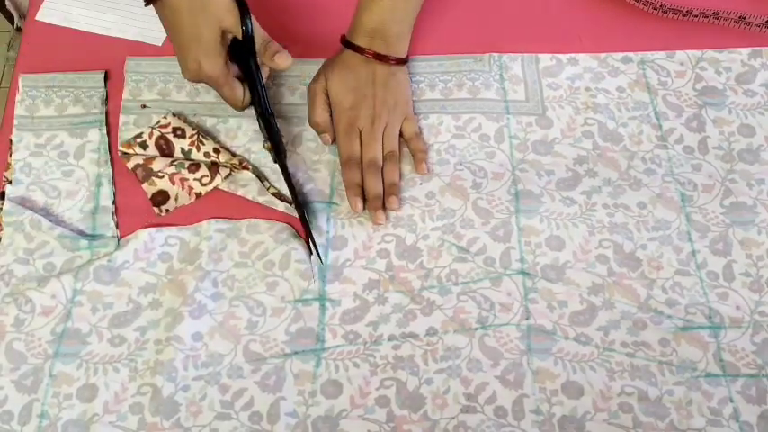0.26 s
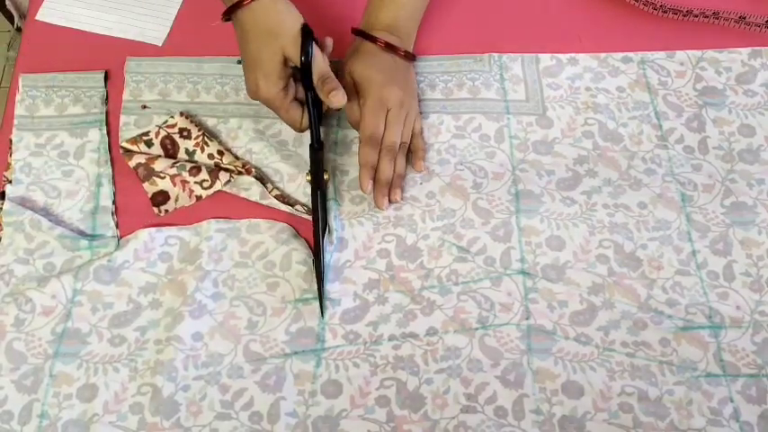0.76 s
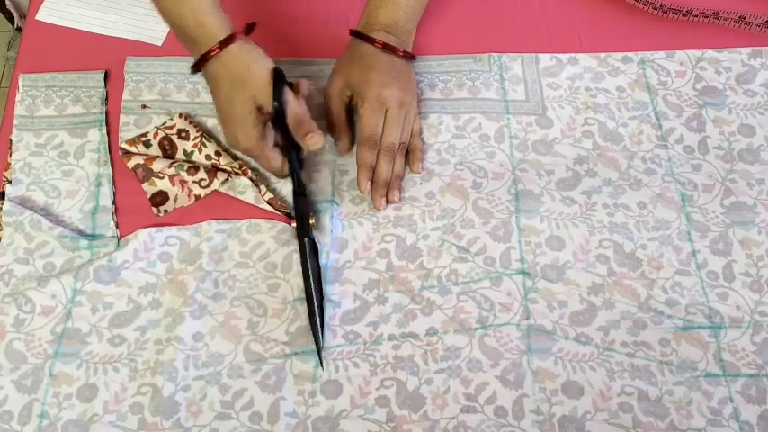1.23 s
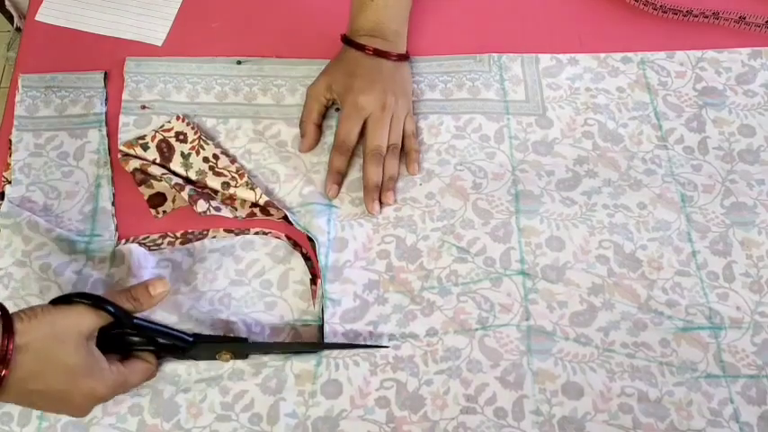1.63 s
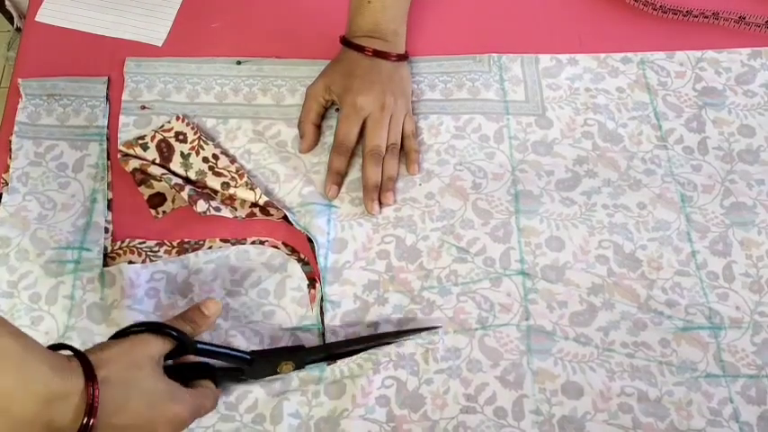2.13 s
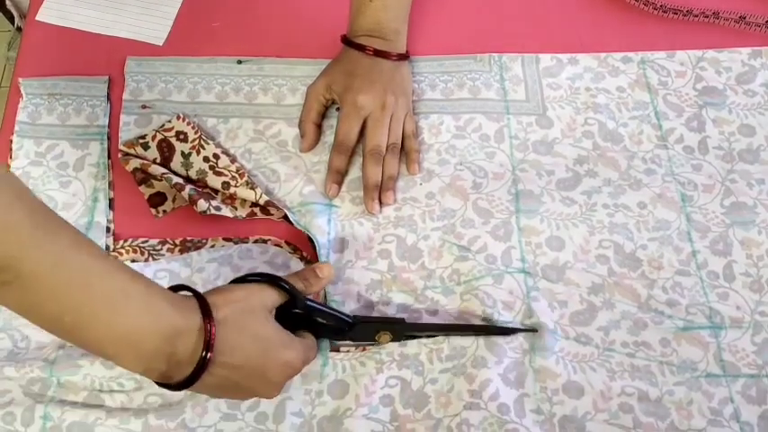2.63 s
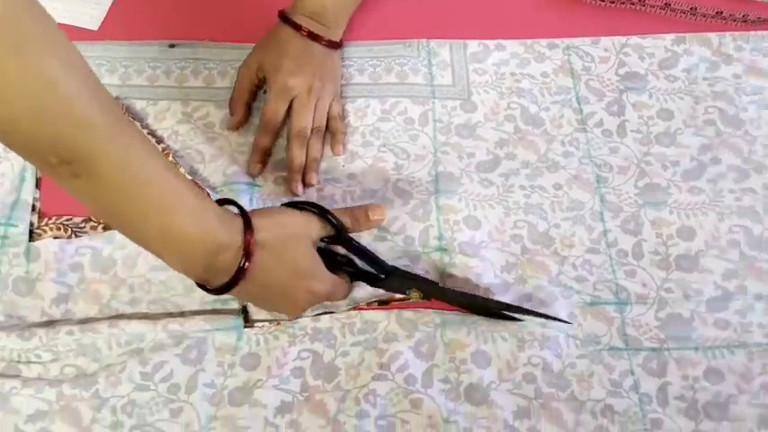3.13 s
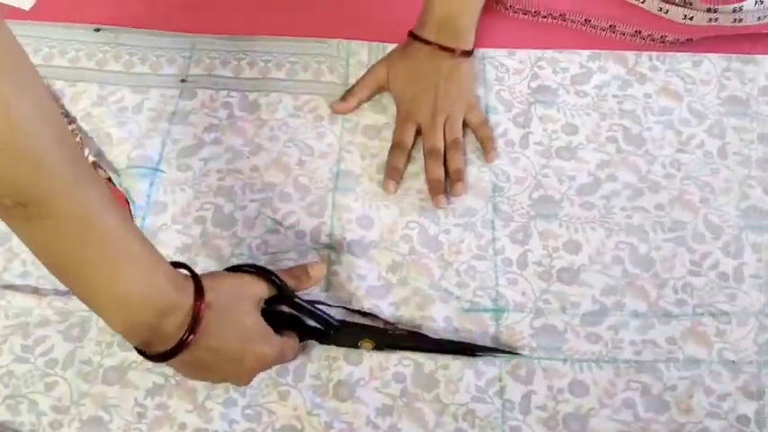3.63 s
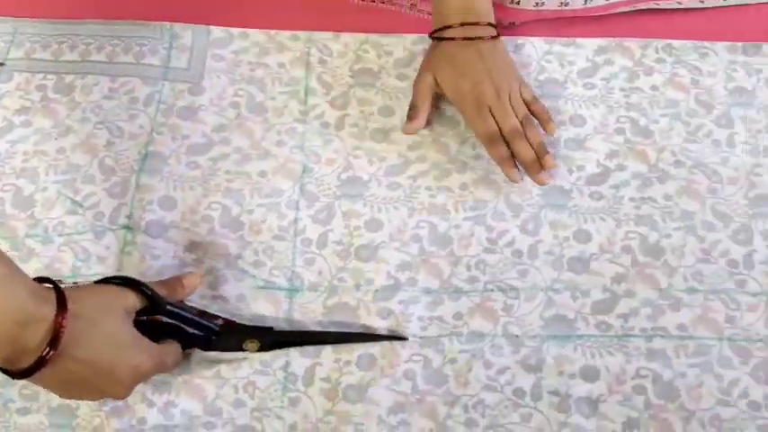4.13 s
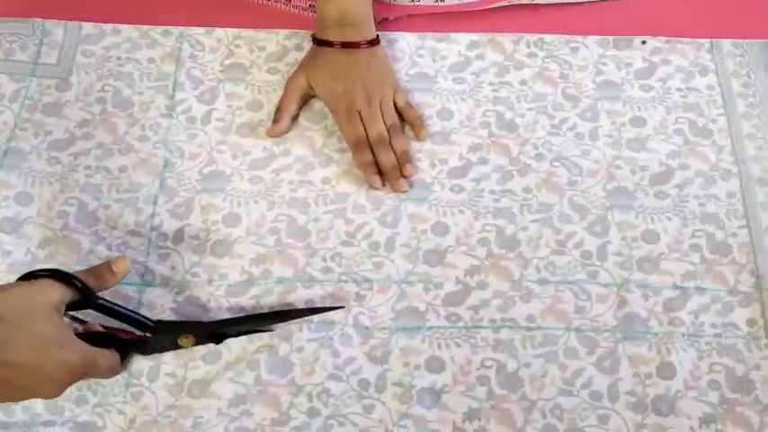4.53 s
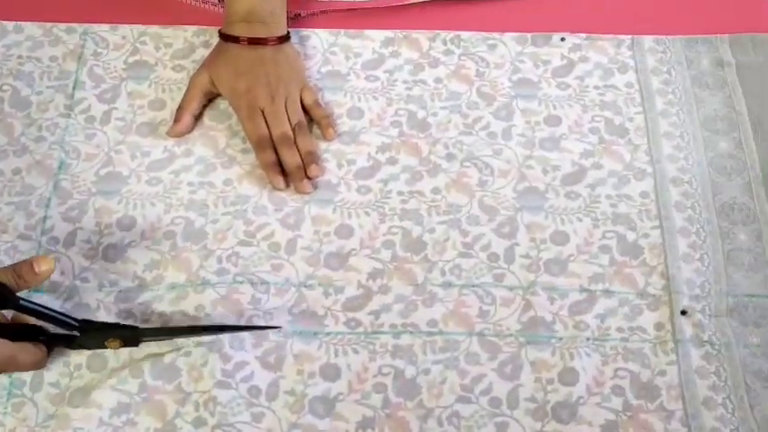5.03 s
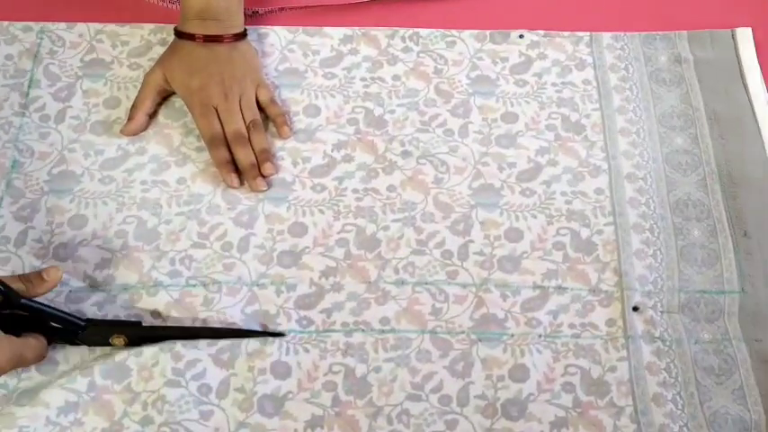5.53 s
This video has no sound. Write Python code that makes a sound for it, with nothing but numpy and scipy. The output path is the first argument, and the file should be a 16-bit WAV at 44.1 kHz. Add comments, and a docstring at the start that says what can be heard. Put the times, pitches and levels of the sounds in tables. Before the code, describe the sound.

Large steel scissors cut layered cloth on a hollow wooden table, heard close up in a quiet room with a faint low hum. From the start, six snips come at roughly four a second, each a short crunchy hiss with a woody thud, with softer scrapes as the blades reopen. Thin, very high squeaks and light steel clicks accompany many strokes. At about 1.4 seconds the cutting pauses, leaving a faint rustle of cloth. It resumes at 2 seconds and runs evenly until about 4.9, with a soft low thump of a hand or handle at 2.4. The lower blade knocks on the wood throughout, most sharply between 3.5 and 4.6 seconds. A second short pause holds another soft thump at about 5.1 seconds. Two last snips with knocks follow at about 5.5 and 5.7 seconds.

```python
"""Large steel scissors snip through layered cloth on a hollow wooden table, about four strokes a second.
Each closing stroke parts threads in a hiss and forces the table's modes into vibration; the reopening
blades scrape more softly. The edges squeak by friction, steel clacks on steel, the lower blade knocks
on the wood, and twice a hand or handle thumps on the cloth. A quiet room hums underneath;
two microphone ports hear the bass alike and the treble apart."""
import sys
import numpy as np
from scipy import signal
from scipy.fft import rfft, irfft, next_fast_len
from scipy.io import wavfile
from scipy.ndimage import uniform_filter1d, map_coordinates

SR = 44100
rng = np.random.default_rng(int(sys.argv[2]) if len(sys.argv) > 2 else 0)


def unload_audio(sound):
    """Save the sound as a 16-bit wav file, at the path given as the first command line argument."""
    columns = np.transpose(np.atleast_2d(sound))
    # keep every value between -1 and 1, then stretch to whole-number steps
    steps = np.round(np.clip(columns, -1, 1) * 32767)
    wavfile.write(sys.argv[1], SR, steps.astype(np.int16))


N = 254016

# Levels in the tables are nominal: each source applies its own gain.
# closing strokes: (bite time [s], length [s], dying time [s], heaviest load [share of length],
# hiss at bite [dB], hiss at shut [dB], boom [dB], middle ring [dB], upper ring [dB], rustle at shut [dB])
CUTS = [ (0.0, 0.015, 0.054, .05, -56, -53.5, -41.5, -56, -51.5, -60.5),
        (0.219, 0.053, 0.067, 0.81, -58.5, -49.5, -42.5, -56, -57, -61),
        (0.65, 0.06, 0.069, 0.17, -60.5, -50.5, -39.5, -55, -55, -63.5),
        (0.899, 0.05, 0.043, 0.17, -54, -46.5, -40, -49.5, -50, -62),
        (1.139, .046, 0.044, 0, -52.5, -48, -36, -50.5, -48.5, -62.5),
        (1.319, 0.069, 0.052, 0.71, -63.5, -49, -38.5, -62.5, -53.5, -58),
        (1.969, 0.081, 0.042, 0.71, -59.5, -44.5, -32.5, -44, -47.5, -60),
        (2.259, 0.055, 0.06, 0.44, -64, -49, -34.5, -45, -49.5, -59),
        (2.502, .066, 0.034, 0.49, -64, -47.5, -32.5, -45.5, -48.5, -59.5),
        (2.746, 0.083, 0.033, 0.86, -62.5, -55, -33, -52, -36.5, -55.5),
        (2.998, 0.056, 0.054, 0.68, -63, -46.5, -39, -41.5, -42.5, -57.5),
        (3.231, 0.07, 0.041, 0.56, -66.5, -51, -37, -39.5, -47.5, -62),
        (3.473, 0.077, .03, 0.51, -58, -53.5, -43, -37, -46.5, -59),
        (3.741, 0.071, 0.043, 0.48, -66, -48.5, -39, -30, -47, -56.5),
        (4.011, 0.042, 0.033, 0.24, -63, -55.5, -45, -35.5, -50, -67),
        (4.293, .05, 0.044, 0.53, -60, -57, -48, -36, -47, -66),
        (4.559, 0.055, 0.049, 0.05, -55.5, -46.5, -37, -35.5, -43, -50),
        (4.841, 0.029, 0.051, 0.26, -59.5, -60, -41, -42, -50, -67.5),
        (5.456, 0.036, 0.081, 0.55, -57, -54, -39.5, -45.5, -48.5, -64),
        (5.718, 0.034, 0.054, 0.5, -54, -50, -40.5, -36.5, -43, -59)]
# reopening blades, and the light scrape that leads into some bites: (time [s], hold [s], scrape [dB], boom
# [dB], upper ring [dB], rustle [dB])
SLIDES = [ (0.086, .14, -72, -55, -73.5, -73.5), (0.342, 0.013, -83, -51, -71.5, -82),
          (0.785, 0.013, -88, -57, -69, -92), (1.008, 0.0097, -76, -59, -65, -90),
          (1.237, 0.014, -88, -55, -69, -98), (1.459, 0.048, -64, -58, -73, -63),
          (1.655, 0.11, -83, -65, -82, -80), (1.886, 0.0099, -107, -68, -79, -69),
          (1.948, .03, -98, -67, -77, -73), (2.071, 0.045, -70, -54.5, -66.5, -79),
          (2.397, 0.005, -49.5, -44.5, -62.5, -58.5), (2.626, 0.013, -62.5, -52, -61, -81),
          (2.891, 0.0074, -66.5, -51, -65, -73), (2.946, 0.024, -71, -56.5, -77, -75),
          (3.121, 0.0071, -60.5, -54, -60.5, -76), (3.337, 0.053, -66, -59, -67, -72.5),
          (3.56, 0.021, -63.5, -64, -73, -78), (3.613, 0.018, -69, -59, -57.5, -80),
          (3.747, 0.026, -86, -58, -80, -92), (3.873, 0.0062, -65, -71, -63, -75),
          (3.985, 0.014, -69.5, -67, -76, -94), (4.115, 0.026, -77, -73, -72, -79),
          (4.415, 0.018, -90, -59, -64.5, -79), (4.484, .03, -76, -80, -78, -73.5),
          (4.672, 0.01, -70, -62, -60.5, -82), (4.77, 0.13, -80, -72, -85, -81),
          (4.935, 0.018, -54.5, -84, -75, -54), (5.425, .025, -65.5, -58.5, -77, -91),
          (5.594, 0.0074, -64.5, -78, -67, -82), (5.703, 0.022, -59.5, -57, -84, -85)]
# edges rubbing: (time [s], nominal length [s], nominal starting pitch [Hz], level [dB])
SQUEAKS = [(0.21, .013, 8700, -63), (0.677, .018, 4480, -59), (0.679, 0.023, 8200, -53),
           (1.156, 0.026, 8260, -46), (1.342, 0.024, 4570, -53), (1.365, 0.037, 7600, -57),
           (1.966, 0.012, 8360, -53), (2.009, 0.014, 8300, -48), (2.107, 0.023, 8600, -60.5),
           (2.253, .025, 12430, -51.5), (2.254, 0.023, 8250, -56.5), (2.283, .024, 8030, -53),
           (2.284, .015, 13100, -50), (2.502, 0.027, 12500, -53.5), (2.754, 0.035, 8640, -58.5),
           (2.755, 0.034, 12500, -57), (2.783, .015, 4560, -56), (2.996, 0.023, 8710, -58),
           (3.113, .015, 7800, -61), (3.228, 0.034, 8370, -58), (3.234, 0.04, 12400, -54),
           (3.486, 0.021, 12400, -55), (3.491, 0.013, 8600, -55), (3.563, .034, 8400, -54),
           (3.569, 0.025, 13940, -55), (3.745, 0.029, 8660, -54.5), (4.008, 0.029, 12500, -56),
           (4.018, 0.015, 8500, -63), (4.281, .029, 8300, -57.5), (4.293, .018, 12400, -53.5),
           (4.31, .015, 13070, -57), (4.425, 0.013, 8500, -61), (4.528, 0.062, 8370, -53),
           (4.679, 0.011, 8000, -56), (4.831, 0.037, 8030, -56), (4.833, 0.036, 12650, -56),
           (4.936, .015, 2477, -47.5), (4.953, 0.019, 8460, -59), (4.955, 0.022, 7160, -59),
           (5.408, 0.071, 8100, -53), (5.456, 0.018, 12900, -50), (5.586, 0.02, 8400, -58.5),
           (5.682, 0.042, 8100, -51), (5.697, 0.042, 12400, -53)]
# blade pitches that attract a squeak: (frequency [Hz])
LOCK_HZ = [2460, 4370, 7480, 8560, 13200, 13900]
# jolts of the lower blade on the table: (time [s], level [dB], relative boom [dB])
KNOCKS = [(0.095, -38, -4), (0.228, -43.5, 12), (0.262, -40, 11), (0.275, -47.5, 17.5), (0.332, -51, 16),
          (0.651, -50.5, 15.5), (0.681, -42, 12), (0.708, -46, 8.5), (0.896, -40.5, 6), (0.922, -35.5, -21),
          (1.145, -31, -21), (1.183, -37.5, 9.5), (1.99, -29.5, -4), (2.047, -35.5, 9.5),
          (2.265, -44.5, 18), (2.272, -46.5, 7), (2.514, -43.5, 8), (2.533, -34.5, 1), (2.549, -58, -7),
          (2.567, -34, 9), (2.761, -27, -1.5), (2.772, -34.5, 8.5), (2.796, -31, -19), (2.815, -29.5, -9),
          (2.824, -44, 16.5), (3.017, -27, -18), (3.033, -42, 7), (3.052, -43, -38), (3.242, -35.5, -21),
          (3.26, -34, 10), (3.299, -34.5, -2), (3.495, -32.5, 2), (3.508, -20, -14), (3.524, -24, -9),
          (3.605, -52, -5), (3.749, -26, -13), (3.772, -29, -21), (3.803, -25, -2), (4.019, -27, -8.5),
          (4.038, -31.5, -1.5), (4.297, -27.5, -5.5), (4.316, -19.5, -14), (4.332, -28, -16),
          (4.553, -32, 2.5), (4.576, -21.5, -4.5), (4.844, -42.5, 14.5), (4.857, -36, 4), (5.464, -38, 10),
          (5.476, -23.5, -2.5), (5.572, -52, 15), (5.719, -31, 1.5), (5.729, -45, 5)]
# tips shutting or pivot play: (time [s], level [dB], relative crack [dB], crack t60 [s])
CLACKS = [(0.9424, -32, -28, 0.028), (1.1763, -38, -42, 0.062), (1.389, -59, -20, 0.078),
          (2.0472, -38, -29, 0.029), (2.3181, -47.5, -10.5, 0.025), (2.5636, -48, -17, 0.03),
          (2.812, -49.5, -5, 0.068), (3.5433, -51.5, -14, 0.046), (3.8043, -37.5, -11, 0.025),
          (4.009, -44, -21.5, 0.098), (4.1016, -43, -32, 0.099), (4.4523, -39.5, -69, 0.085),
          (5.6286, -65.5, -10, 0.03)]
# a hand or handle landing on the cloth: (time [s], level [dB], final pitch [Hz], t60 [s])
THUMPS = [(2.403, -30.5, 108, 0.15), (5.137, -34, 103, 0.073)]
# the scissors' path over the table:
# (time [s], rings left minus right [dB], idle rustle [dB], idle boom [dB], puff relative to boom [dB])
TRAVEL = [(0.0, 2.5, -62, -75, -26), (0.14, 5, -69, -70, -24), (0.32, 3, -76.5, -67.5, -24),
          (1.03, 0, -89, -53, -25), (1.5, 1.5, -80.5, -69.5, -30), (1.91, 8, -81, -60.5, -31),
          (2.13, -2, -90, -81, -36), (2.57, 5, -93, -69, -30), (3.5, 3.5, -74.5, -81, -19),
          (3.85, 2, -85, -73, -15), (4.54, 4, -71, -85, -19), (5.1, -1, -83.5, -69.5, -28),
          (5.76, 1, -91, -58.5, -12)]
# table modes: (frequency [Hz], bandwidth [Hz], level [dB], left lead [rad], left minus right [dB])
BOOM_MODES = [(306.7, 52.5, -4.5, 0.16, 1), (188, 110, -14, .1, 2.5), (262.5, 25.4, 2.5, 0.077, -0.5),
              (128.8, 84, -13, 0.017, 0)]
MIDDLE_MODES = [(683.5, 119, -2.5, -0.76, 0.0084), (760, 46.5, 2, -0.82, 0.011), (802, 130, -7.5, -1.62, 0),
                (512, 315, -18, -0.79, 0)]
UPPER_MODES = [(968, 107, -8, -1.3, 0), (1127, 78, -1, -2.07, 0.0081), (1334, 186, -15.5, -2.03, 1)]
# blade resonances: (frequency [Hz], bandwidth [Hz], level [dB])
BLADE_MODES = [(8450, 89, 0.5), (13100, 290, -12), (14100, 1200, -11.5)]
# noise of shearing, scraping, dull rustling and the room: (frequency [Hz], spectral density [dB])
SHEAR_SPECTRUM = [(1760, -15.5), (3000, -10), (4550, -2), (5690, -9.5), (6180, -3), (8630, -3), (9780, -6),
                  (14700, -4), (15800, -1)]
SCRAPE_SPECTRUM = [(1760, -9), (3000, -4), (4490, -2.5), (8570, -2), (9780, -8.5), (12400, -6.5),
                   (14900, -11), (15800, 1)]
RUSTLE_SPECTRUM = [(900, -15), (1500, -9.5), (2400, 0.5), (3200, -6.5), (5000, -18.5), (9000, -65)]
ROOM_SPECTRUM = [(15, -53), (25, -9), (184, -5), (255, 0.5), (572, -16), (981, -18), (1590, -27),
                 (2260, -28.5), (5370, -43.5), (8270, -40), (9990, -49.5), (14600, -37), (15800, -71)]
# slopes before and after a cut's heaviest load: (boom [dB/s], middle [dB/s], upper [dB/s])
LOAD_DB_PER_S = [139, 318, 257]
EASE_DB_PER_S = [157, 245, 189]
# fall over a cut's dying time: (hiss [dB], boom [dB], middle [dB], upper [dB], rustle [dB])
DYING_DB = [39.2, 27.4, 24.7, 23, 23]
# slopes before and after a slide's hold: (scrape [dB/s], boom [dB/s], upper [dB/s], rustle [dB/s])
SWELL_DB_PER_S = [1190, 520, 795, 960]
FADE_DB_PER_S = [715, 407, 590, 550]
# likeness of the room noise at the two ports: (frequency [Hz], correlation [0-1])
ROOM_COHERENCE = [(60, 0.65), (300, 0.58), (700, 0), (1500, 0), (15000, 0.24)]
# the right side is slightly brighter: (frequency [Hz], left minus right [dB])
TREBLE_BALANCE = [(9000, 0.5), (13000, -1.5)]
# the treble fades out just below 16 kHz: (frequency [Hz], gain [dB])
ROLL_OFF = [(15200, -0.5), (15800, -12)]

BITE_S, BITE_DB = .012, 16.5  # time and rise as the edges take hold
RUSTLE_DB_PER_S = 133  # the rustle grows until the tips shut
PULL_PER_S = 23.8  # pull on a squeak towards the nearest blade pitch
ROOM_DB, TOP_HZ = -63, 15830
SIDE = np.array([[.5], [-.5]])  # splits a left-right difference between the two sides


def cuts():
    """Shear: parting threads hiss and drive the table, while the folding cloth displaces a puff of air."""
    hiss, boom, middle, upper, rustle = closing_envelopes()
    rings = forced_vibration(MIDDLE_MODES, middle, rate=250, apart=0.55)
    rings += forced_vibration(UPPER_MODES, upper, rate=400, apart=1.0)
    wood = table_boom(boom, rate=300) + port_gains() * rings
    air = rng.standard_normal(N) + 0.66 * rng.standard_normal((2, N))
    puff = unit(filtered(air, lambda f: resonance(f, hz=59, width=120) * cushion(f, soft_hz=111)))
    puff_gain = amp(travel(column=4)) * uniform_filter1d(boom, size=500)
    shear = friction(SHEAR_SPECTRUM, hiss, rate=500, alike=0.35)
    cloth = friction(RUSTLE_SPECTRUM, rustle, rate=920, alike=0.78)
    return shear + amp(-3.5) * (cloth + wood) + puff_gain * puff


def closing_envelopes():
    """Amplitude follows load: the table peaks at the heaviest; hiss and rustle run from bite to shut."""
    gains, t = np.zeros((5, N)), np.arange(N) / SR
    for s, length, dying, load, bite_db, shut_db, *peak_db, rustle_db in CUTS:
        near = slice(max(0, round((s - .05) * SR)), round((s + length + .2) * SR))
        age = t[near] - s
        inside = np.clip(age, 0, length)
        hiss_db = bite_db + (shut_db - bite_db) * inside / length
        wood_db = np.c_[peak_db] - np.c_[LOAD_DB_PER_S] * np.clip(load * length - inside, 0, None)
        wood_db -= np.c_[EASE_DB_PER_S] * np.clip(inside - load * length, 0, None)
        cloth_db = rustle_db - RUSTLE_DB_PER_S * (length - inside)
        onset_db = BITE_DB * np.clip(-age, 0, None) / BITE_S
        decay_db = np.c_[DYING_DB] * np.clip(age - length, 0, None) / dying
        gains[:, near] += amp(np.vstack([hiss_db, wood_db, cloth_db]) - onset_db - decay_db)
    return uniform_filter1d(gains, size=180, axis=1)


def slides():
    """Sliding friction: the blades reopen and advance, or graze just before a bite; cloth and table sound
    faintly between strokes."""
    hiss, boom, upper, rustle = opening_envelopes()
    idle_rustle, idle_boom = amp(travel(column=2)), amp(travel(column=3))
    wood = table_boom(boom + idle_boom, rate=280)
    wood += port_gains() * forced_vibration(UPPER_MODES, upper, rate=630, apart=0.96)
    scrape = friction(SCRAPE_SPECTRUM, hiss + idle_rustle, rate=1500, alike=0.36)
    cloth = friction(RUSTLE_SPECTRUM, rustle, rate=2000, alike=0.76)
    return scrape + amp(-1.0) * cloth + wood


def opening_envelopes():
    """Exponential growth and decay: scrape, boom, upper ring and rustle swell, hold and fade."""
    gains, t = np.zeros((4, N)), np.arange(N) / SR
    for s, hold, *peak_db in SLIDES:
        near = slice(max(0, round((s - .15) * SR)), round((s + hold + .2) * SR))
        swell_db = np.c_[SWELL_DB_PER_S] * np.clip(s - t[near], 0, None)
        fade_db = np.c_[FADE_DB_PER_S] * np.clip(t[near] - s - hold, 0, None)
        gains[:, near] += amp(np.c_[peak_db] - swell_db - fade_db)
    return uniform_filter1d(gains, size=340, axis=1)


def friction(spectrum, gain, rate, alike):
    """Friction noise: many fibres sum to a hiss with snaps; alike weights the part both ports share."""
    fibres = rng.standard_normal((2, N)) + alike * rng.standard_normal(N)
    fibres += 0.76 * snaps(rate, spread_db=-0.5, channels=2)
    hiss = fibre_resonances(filtered(fibres, lambda f: amp(along(spectrum, f))), depth_db=3.5)
    return gain * amp(1.07 * wobble(90)) * hiss / np.std(hiss.mean(axis=0))


def snaps(rate, spread_db, channels):
    """A Poisson process: threads part as impulses of uneven size, on average rate a second."""
    shape = (channels, N)
    parted = rng.random(shape) < rate / SR
    return unit(parted * rng.standard_normal(shape) * amp(spread_db * rng.standard_normal(shape)))


def fibre_resonances(x, depth_db):
    """Transient resonance: tearing fibres colour the noise in narrow random patches of some 30 ms."""
    spectra = signal.stft(x, nperseg=512)[2]
    patches = uniform_filter1d(rng.standard_normal(spectra.shape[1:]), size=3, axis=0)
    patches = uniform_filter1d(patches, size=5, axis=1)
    return unit(signal.istft(spectra * amp(depth_db * unit(patches)), nperseg=512)[1][:, :N])


def table_boom(gain, rate):
    """Superposition: the highest boom mode and the lower ones are driven independently and summed."""
    high_gain = amp(-4)
    low = forced_vibration(BOOM_MODES[1:], gain, rate, apart=0.18, soft_hz=386)
    high = forced_vibration(BOOM_MODES[:1], gain * high_gain, rate, apart=0.53, soft_hz=370)
    return (low + high) / np.sqrt(1 + high_gain ** 2)


def forced_vibration(modes, gain, rate, apart, soft_hz=1500):
    """Forced vibration: snaps drive the table; apart weights the patch that each port hears alone."""
    force = snaps(rate, spread_db=4.5, channels=1) + apart * snaps(rate, spread_db=6, channels=2)
    response = table_response(modes, soft_hz)
    left, right = response(np.arange(SR // 2))
    power = np.mean(abs(left + right) ** 2 + apart ** 2 * (abs(left) ** 2 + abs(right) ** 2)) / 4
    return filtered(force * gain, response) / np.sqrt(power)


def table_response(modes, soft_hz):
    """Modal radiation: each mode reaches the two ports with its own phase and balance."""
    return lambda f: cushion(f, soft_hz) * sum(
        (-1) ** k * amp(db + SIDE * pan_db) * np.exp(1j * SIDE * lead) * resonance(f, hz, width)
        for k, (hz, width, db, lead, pan_db) in enumerate(modes))


def cushion(f, soft_hz):
    """Compliance: the cloth softens every blow as a causal double low-pass."""
    return 1 / (1 + 1j * f / soft_hz) ** 2


def squeaks():
    """Friction-excited vibration: a gliding narrow band whose strength and phase flutter at each port."""
    out = np.zeros((2, N + SR))
    for s, length, start_hz, db in SQUEAKS:
        lock_hz = min(LOCK_HZ, key=lambda hz: abs(np.log(hz / start_hz)))
        glide_hz = (lock_hz - start_hz) * min(1, PULL_PER_S * length)
        progress = np.linspace(0, 1, round(1.17 * length * SR))
        phase = 2 * np.pi * np.cumsum(start_hz + glide_hz * (1.58 * progress - .25)) / SR
        knots = rng.standard_normal((4, 128))
        flutter = np.array([np.interp(progress * length * 1300, np.arange(128), k) for k in knots])
        tone = (0.17 + flutter[:2]) * np.cos(phase) + flutter[2:] * np.sin(phase)
        envelope = np.sin(np.pi * progress ** 0.79) ** 0.99
        out[:, round(s * SR):][:, :len(progress)] += amp(db) * envelope * tone
    return out[:, :N]


def knocks():
    """Impulse response: each jolt of the lower blade leaves the table's modes ringing freely."""
    ring, boom = np.zeros((2, N))
    for s, db, boom_db in KNOCKS:
        ring[round(s * SR)] = amp(db + 32)  # narrow modes need a strong impulse
        boom[round(s * SR)] = amp(db + boom_db + 39.5)
    rings = filtered(ring, table_response(MIDDLE_MODES + UPPER_MODES, soft_hz=1540))
    return port_gains() * rings + filtered(boom, table_response(BOOM_MODES, soft_hz=450))


def clacks():
    """Impact of steel on steel: a high-passed crack and a damped rattle in the blades."""
    rattle, crack = np.zeros((2, 2, N + SR))
    t = np.arange(SR // 8) / SR
    for s, db, crack_db, t60 in CLACKS:
        noise = rng.standard_normal((2, 2, len(t)))
        rattle[:, round(s * SR):][:, :len(t)] += amp(db + 13 - 60 * t / (0.92 * t60)) * noise[0]
        crack[:, round(s * SR):][:, :len(t)] += amp(db + crack_db + 16.5 - 60 * t / t60) * noise[1]
    ringing = filtered(rattle[:, :N], blade_response)
    return ringing + filtered(crack[:, :N], lambda f: 1j * f / (1800 + 1j * f))


def blade_response(f):
    """Modal summation: the blades' treble resonances add with alternating sign."""
    return sum((-1) ** k * amp(db) * resonance(f, hz, width)
               for k, (hz, width, db) in enumerate(BLADE_MODES))


def thumps():
    """Damped oscillation after soft contact: the low pitch sags as the cloth compresses."""
    out, t = np.zeros(N + SR), np.arange(SR // 4) / SR
    for s, db, hz, t60 in THUMPS:
        phase = 2 * np.pi * hz * (t + 0.0023 * (1 - np.exp(-t / 0.0046)))
        attack = 1 - np.exp(-t / 0.00052)
        out[round(s * SR):][:len(t)] += amp(db - 60 * t / t60) * attack * np.sin(phase)
    return out[:N]


def reverberation(x, t60=0.067):
    """Diffuse reflection: the room answers with a short, delayed tail, damped by the cloth."""
    t = np.arange(SR // 4) / SR
    tail = rng.standard_normal((2, len(t))) * amp(-60 * t / t60)
    delayed = np.pad(x, ((0, 0), (300, 0)))
    return signal.fftconvolve(delayed, tail / np.linalg.norm(tail[0]), axes=1)[:, :N]


def room_hum():
    """Partly coherent noise: a low hum and faint hiss, wavering a little in level."""
    def mid_side_response(f):
        angle = np.arccos(np.clip(along(ROOM_COHERENCE, f), -1, 1)) / 2
        return amp(along(ROOM_SPECTRUM, f)) * [np.ones_like(f), np.tan(angle)]
    mid, side = filtered(rng.standard_normal((2, N)), mid_side_response)
    level = amp(ROOM_DB + 2.0 * wobble(2.474) + 0.45 * wobble(8.7)) / np.std(mid)
    return level * np.array([mid + side, mid - side])


def port_gains():
    """Level difference between the ports as the scissors move."""
    return amp(travel(column=1) * SIDE)


def travel(column):
    """Linear interpolation of one TRAVEL column, per sample."""
    columns = np.transpose(TRAVEL)
    return np.interp(np.arange(N) / SR, columns[0], columns[column])


def resonance(f, hz, width):
    """Response of a damped oscillator, peak gain 1."""
    return 1j * f * width / (hz * hz - f * f + 1j * f * width)


def filtered(x, response):
    """Linear filtering: the spectrum of x times a complex response."""
    size = next_fast_len(N + SR // 2)
    return irfft(rfft(x, size) * response(np.fft.rfftfreq(size, 1 / SR)), size)[..., :N]


def wobble(rate):
    """Spline through random knots, rate a second."""
    return map_coordinates(rng.standard_normal(int(N * rate / SR) + 4), [np.arange(N) * rate / SR])


def along(points, hz):
    """Interpolation on a logarithmic frequency axis."""
    f, values = np.transpose(points)
    return np.interp(np.log(hz + 1), np.log(f + 1), values)


def amp(db):
    """Decibels to amplitude ratio."""
    return 10 ** (np.asarray(db) / 20)


def unit(x):
    """Normalisation to rms 1."""
    return x / np.sqrt(np.mean(x ** 2) + 1e-20)


def scene():
    """Superposition of the direct sound of scissors and table, its reverberation and the room's hum."""
    direct = cuts() + slides() + squeaks() + knocks() + clacks() + thumps()
    return direct + amp(-20.5) * reverberation(direct) + room_hum()


def record(dry):
    """Spectral shaping: the right side is slightly brighter; the treble fades out just below 16 kHz."""
    def response(f):
        return amp(SIDE * along(TREBLE_BALANCE, f) + along(ROLL_OFF, f)) * (f < TOP_HZ)
    return filtered(dry, response)


dry = scene()
out = record(dry)
unload_audio(out)
```